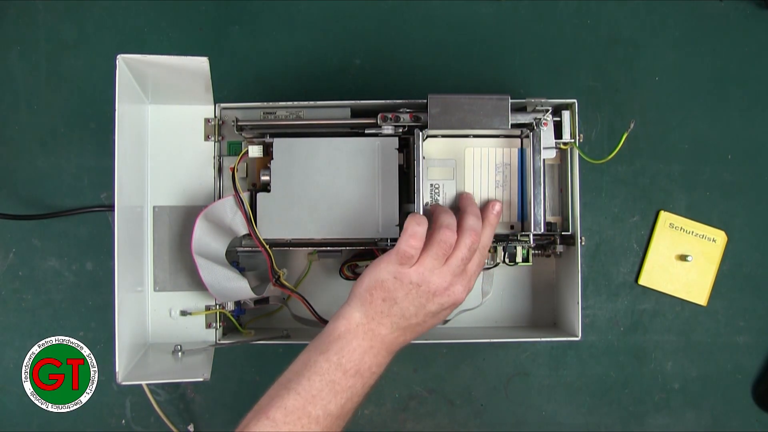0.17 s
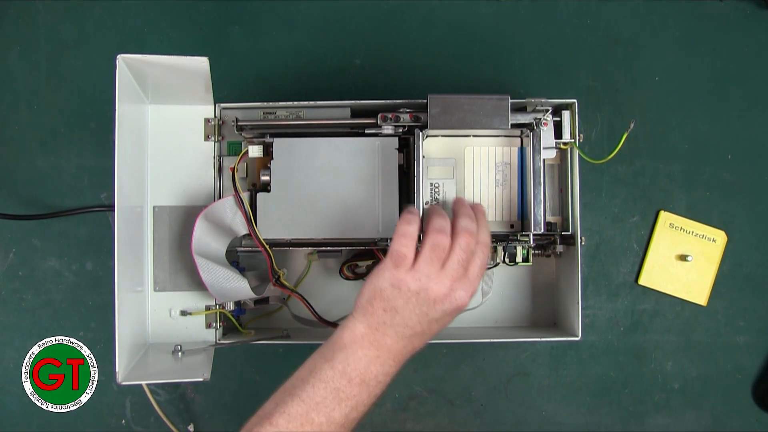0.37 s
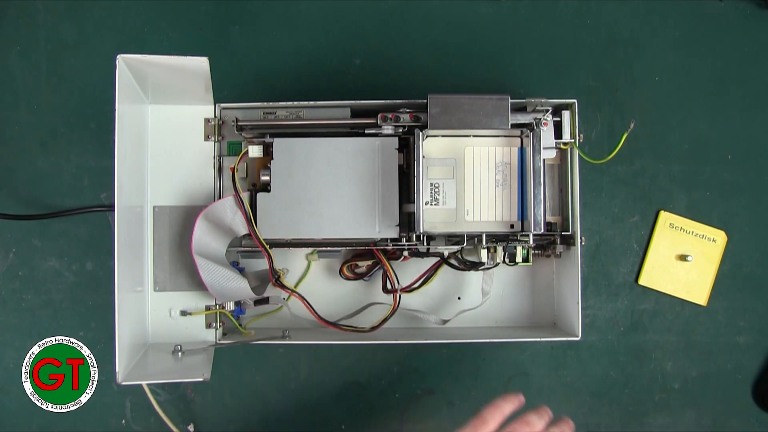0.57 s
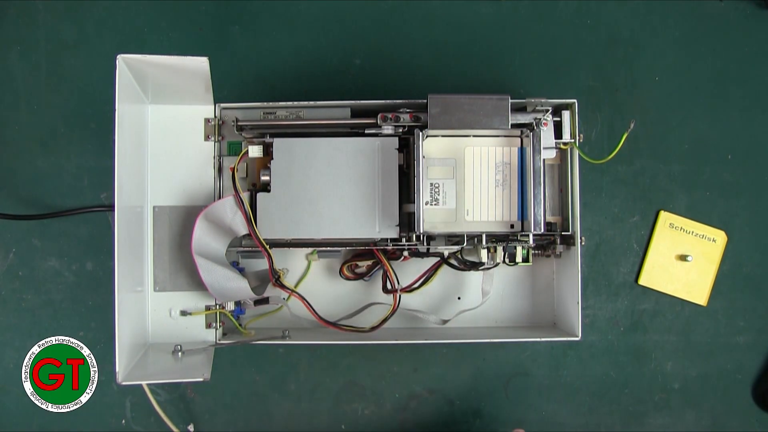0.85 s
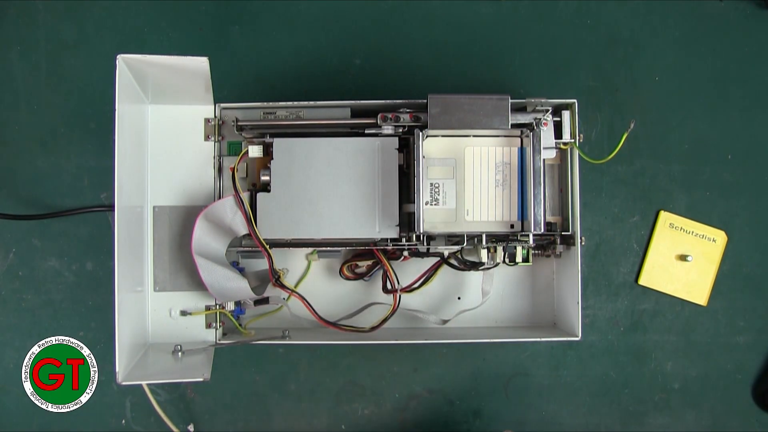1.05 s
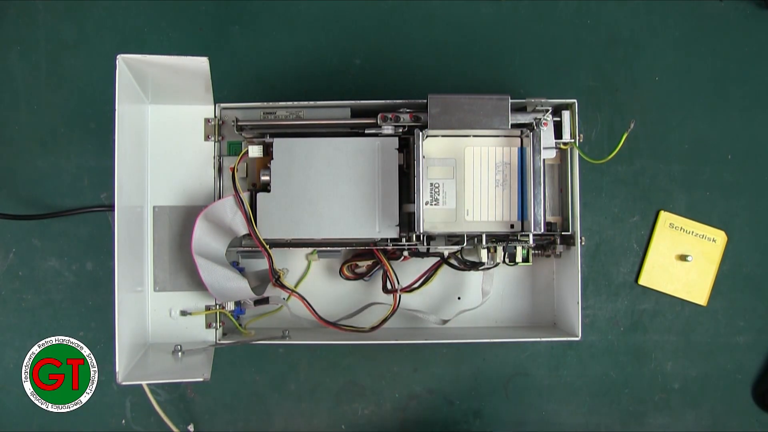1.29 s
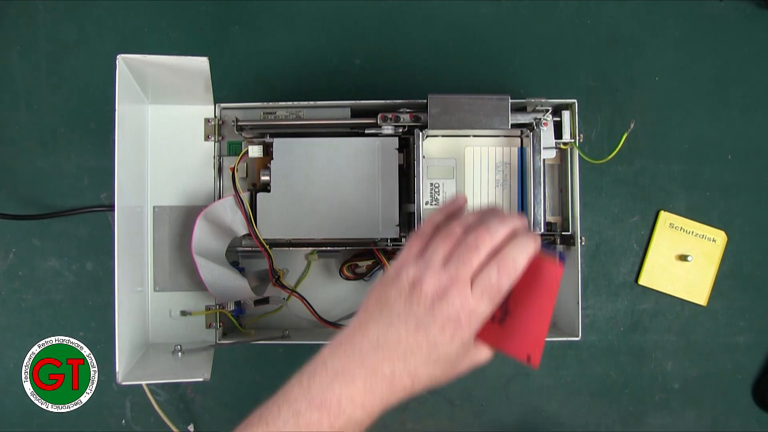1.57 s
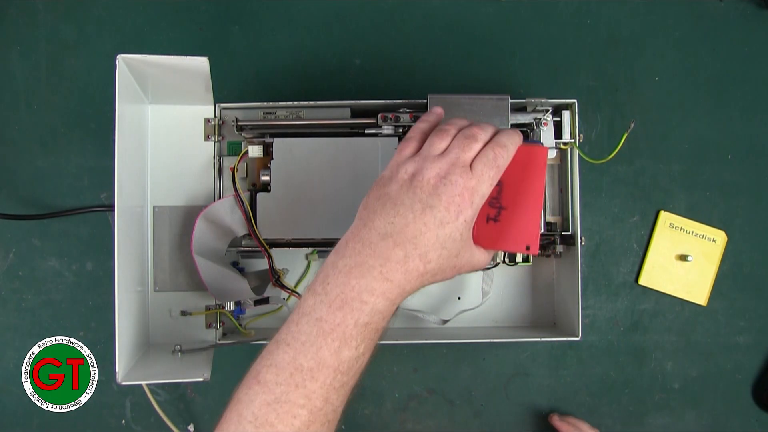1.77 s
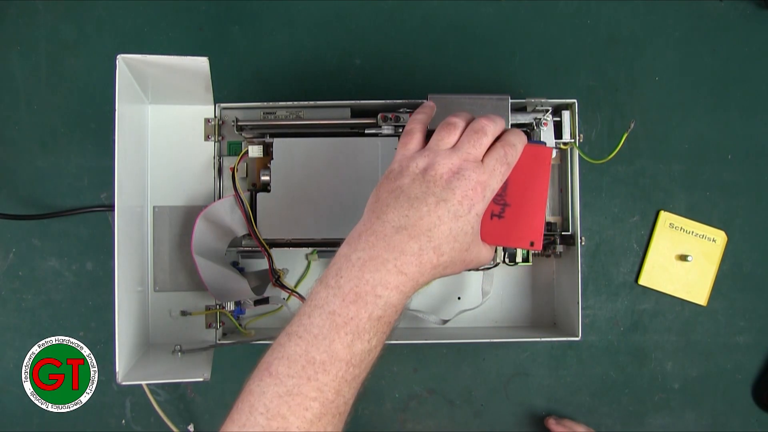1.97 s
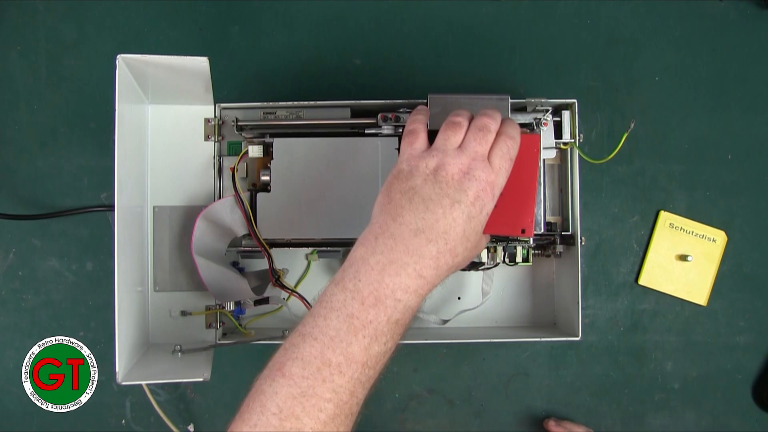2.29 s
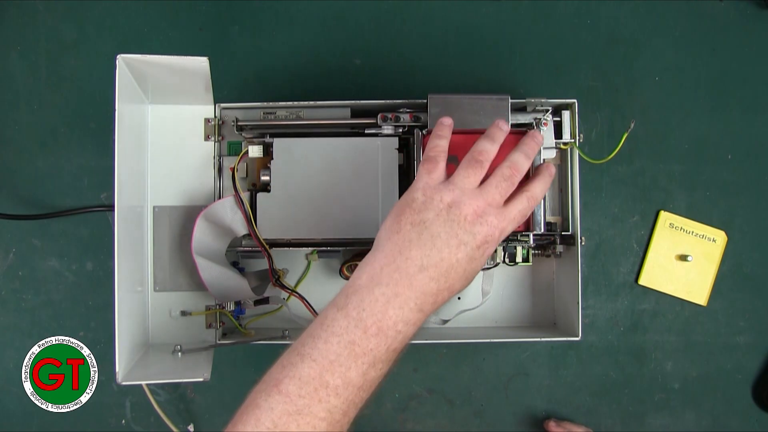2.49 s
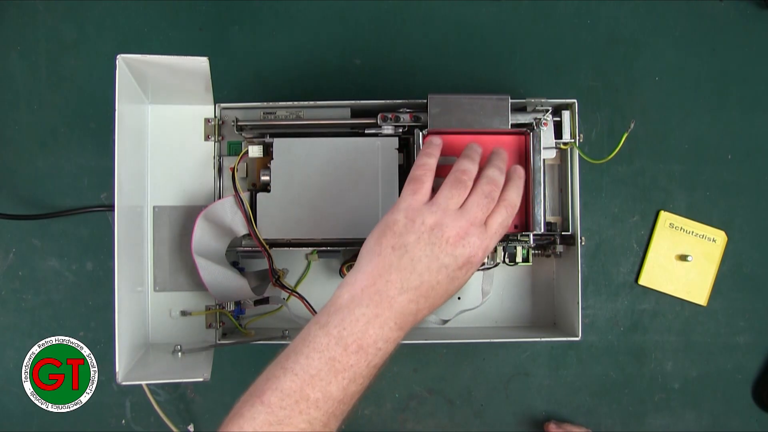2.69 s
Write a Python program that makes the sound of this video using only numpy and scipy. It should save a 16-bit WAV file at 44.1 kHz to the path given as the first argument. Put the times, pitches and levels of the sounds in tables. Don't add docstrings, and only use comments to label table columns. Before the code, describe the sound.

Plastic disks clatter into a sheet-metal magazine, heard close in a small, dry room with faint mains hum and hiss. Light clicks lead to the loudest, hard clack with a table thump at 0.23 s, settling by 0.35. Quiet handling follows, with a small tick and slide near 0.9 s and barely audible rubs. From 1.85 to 2.8 s a longer, uneven run of metallic clacks, rattles and scrapes settles.

```python
import sys
import numpy as np
from scipy import signal
from scipy.fft import rfft, irfft
from scipy.io import wavfile

SR = 44100
rng = np.random.default_rng(int(sys.argv[2]) if len(sys.argv) > 2 else 0)


def ratio(d):
    e = np.asarray(d, float) / 20
    return 10 ** e


def store_pcm(level_fs):
    pcm = np.round(np.clip(level_fs, -1, 1) * 32767).astype(np.int16)
    wavfile.write(sys.argv[1], SR, np.atleast_2d(pcm).T)


N = 125685


def unit_rms(x):
    return x / np.sqrt(np.mean(x ** 2) + 1e-20)


def at_peak(sound, peak_db):
    return ratio(peak_db) * sound / abs(sound).max()


def read(points, hz):
    point_hz, value = np.transpose(points)
    return np.interp(np.log(hz + 1), np.log(point_hz + 1), value)


def add(mix, start_s, sound):
    part = mix[max(round(start_s * SR), 0):][:len(sound)]
    part += sound[:len(part)]


def ring(hz, db, t60, size, phase=0.):
    t = np.arange(size)[:, None] / SR
    return (ratio(db - 60 * t / t60) * np.sin(2 * np.pi * hz * t + phase)).sum(1)


def coloured(x, spectrum):
    gain = ratio(read(spectrum, np.fft.rfftfreq(len(x), 1 / SR)))
    return irfft(rfft(x) * gain, len(x))


def causal(db):
    cepstrum = irfft(np.maximum(db, -100) * np.log(10) / 20)
    half = len(cepstrum) // 2
    cepstrum[1:half] *= 2
    cepstrum[half + 1:] = 0
    return irfft(np.exp(rfft(cepstrum)))


def clicks(per_s, spread_db, size):
    chance, strength, sign = rng.random((3, size))
    size_db = -spread_db * np.log(1 - .99 * strength)
    return (chance < per_s / SR) * ratio(size_db) * np.sign(sign - .5)


def bounces(size):
    return clicks(per_s=5000, spread_db=4, size=size)


# frequency in Hz, level in dB.
AIR_COLOUR = [(20, -12), (45, 2), (75, -14), (110, -16), (220, -25), (700, -24), (3800, -27.5), (5000, -31),
              (16000, -52)]
# frequency in Hz, level in dB rms.
MAINS_HUM = [(50, -65), (150, -77), (250, -94), (450, -91.5)]


def air():
    t = np.arange(N) / SR
    hiss = unit_rms(coloured(rng.standard_normal(N), AIR_COLOUR))
    hum = sum(np.sqrt(2) * ratio(db) * np.sin(2 * np.pi * hz * t) for hz, db in MAINS_HUM)
    return ratio(-71.5) * hiss + hum


# frequency in Hz, t60 in seconds.
ROOM_DECAY = [(100, 0.14), (500, .25), (2000, 0.13), (4000, 0.12), (8000, 0.21), (15000, 0.033)]


def room(x, count=3):
    size, spacing, gap_s = SR // 2, 12, .004
    out = np.zeros(N)
    turn = np.arange(N) / SR * 23
    for k in range(count):
        taps = np.zeros(size)
        at = np.arange(0, size - spacing, spacing)
        taps[at + rng.integers(0, spacing, len(at))] = rng.choice([-1., 1.], len(at))
        taps *= np.arange(size) > gap_s * SR
        hz, t, bands = signal.stft(taps, SR, nperseg=256)
        decay = ratio(-60 * t / read(ROOM_DECAY, hz)[:, None])
        tail = signal.istft(bands * decay, SR, nperseg=256)[1]
        feed = np.sqrt(2 / count) * np.cos(turn + np.pi * k / count)
        out += signal.fftconvolve(x * feed, tail / np.linalg.norm(tail))[:N]
    return out


# frequency in Hz, level in dB, t60 in seconds.
TABLE_MODES = [(84.65, 3.5, 0.28), (102, -12, 0.064), (61, -14, 0.15), (215.3, -6, 0.075),
               (380.8, -5.5, 0.11)]
# start in seconds, peak in dB, lift of the upper modes in dB.
TABLE_THUMPS = [(0.021, -51.5, 10.5), (0.138, -53.5, -21), (0.201, -45.5, 8), (0.23, -21, 3),
                (0.299, -39, 3), (0.348, -49, -6), (1.849, -51.5, -12), (2.069, -52, 11), (2.262, -35.5, 4),
                (2.33, -46, 7.5), (2.447, -44, 1.5), (2.511, -38, 6), (2.578, -52, 13), (2.789, -33.5, 6)]


def table():
    hz, db, t60 = np.transpose(TABLE_MODES)
    rise_s, size = 0.0072, 16000
    rise = np.sin(np.pi / 2 * np.minimum(np.arange(size) / SR / rise_s, 1)) ** 2
    out = np.zeros(N)
    for start_s, peak_db, upper_db in TABLE_THUMPS:
        boom = rise * ring(hz, db + upper_db * (hz > 150), t60, size)
        add(out, start_s, at_peak(boom, peak_db))
    return out


def rubbing(strokes, spectrum):
    t = np.arange(N) / SR
    rub = unit_rms(coloured(clicks(per_s=5600, spread_db=1, size=N), spectrum))
    low = signal.sosfiltfilt(signal.butter(2, 2600, fs=SR, output="sos"), rub)
    treble = rub - low
    out = np.zeros(N)
    for top_s, swell, fade, level_db, treble_db in strokes:
        slope = np.where(t < top_s, swell, fade)
        stroke = ratio(level_db - slope * np.hypot(t - top_s, .005))
        out += stroke * (low + ratio(treble_db) * treble)
    return out


# loudest moment in seconds, swell in dB per s,
# fade in dB per s, level in dB, treble in dB.
PICKUP_STROKES = [
    (.826, 2001, 400, -72.5, 1),
    (.878, 600, 222, -76, 17.5),
    (.95, 482, 650, -37, -0.5),
    (1.155, 297, 300, -73, -5),
    (1.222, 900, 256, -71, -1),
    (1.378, 900, 500, -83, -12),
    (1.44, 700, 600, -69.5, 6.5),
    (1.65, 403, 400, -98, 3),
    (1.72, 401.5, 402, -92, -5),
    (1.84, 500, 900, -70, 3),
]
# frequency in Hz, density in dB per Hz.
PICKUP_COLOUR = [(180, -79), (300, -55), (1100, -13), (1900, -3), (2450, -13), (3290, -2.5), (4200, -12),
                 (8220, -22.5), (16000, -43)]


def pickup_slides():
    return rubbing(PICKUP_STROKES, PICKUP_COLOUR)


# loudest moment in seconds, swell in dB per s,
# fade in dB per s, level in dB, treble in dB.
STACK_STROKES = [
    (.009, 591, 442, -32, -3),
    (.222, 499.5, 901.5, -41.5, 15),
    (.25, 3001, 270.5, -32, 9.5),
    (1.86, 3000, 203, -49, 9.5),
    (1.935, 900, 297, -48, -31),
    (2.22, 900, 190, -31, -3),
    (2.35, 504, 239, -41, -5),
    (2.5, 297, 151, -43, 12),
    (2.59, 303, 190, -49.5, -25),
    (2.778, 3000, 300, -39, 1.5),
]
# frequency in Hz, density in dB per Hz.
STACK_COLOUR = [(250, -45.5), (500, -18), (700, 2.5), (1300, -1.5), (2300, -2.5), (3500, 0), (5500, -17.5),
                (16000, -43.5)]


def stack_shuffles():
    return rubbing(STACK_STROKES, STACK_COLOUR)


# frequency in Hz, level in dB, t60 in seconds.
CASE_PANELS = [(216, -1.5, .12), (310, -4.5, 0.42)]


def case(loads):
    place, turn = rng.random(size=(2, 150))
    mode_hz = 500 + (4300 - 500) * place
    high = ring(mode_hz, 0, t60=.3, size=20000, phase=2 * np.pi * turn)
    deep = ring(*np.transpose(CASE_PANELS), size=8000)
    push = signal.sosfilt(signal.butter(2, 130, "high", fs=SR, output="sos"), abs(loads))
    murmur = signal.fftconvolve(loads, high / np.linalg.norm(high))[:N]
    panels = signal.fftconvolve(push, deep / np.linalg.norm(deep))[:N]
    return ratio(-23) * murmur + ratio(-40) * panels


# frequency in Hz, level in dB, t60 in seconds.
MAGAZINE_MODES = [(573, -6.5, 0.027), (657, -5.5, 0.018), (822, -3, 0.046), (918, -7, 0.12),
                  (1100, -1, 0.046), (1175, -14, 0.13), (1833, -11.5, .08), (2115, -10, 0.061),
                  (2257, -3.5, 0.09), (2703, -11.5, 0.25), (3440, -7, .05), (3700, -14, .06),
                  (4350, -17.5, 0.036), (8170, -29.5, 0.06)]
# frequency in Hz, density in dB per Hz.
SHELL_COLOUR = [(150, -59), (250, -33.5), (501, -23), (651, 2), (723, -4.5), (1140, -1), (1550, -9),
                (3340, -9), (16000, -42.5)]


def contact(peak_db, ring_hz, treble_db, rattle_s, cut_hz, metal_db, focus_db):
    f = np.fft.rfftfreq(4096, 1 / SR) + 1

    def focus(hz):
        return focus_db * np.exp(-(np.log2(hz / ring_hz) / 0.23) ** 2)

    ripple_db = 2.5 * np.interp(np.log2(f) / .15, np.arange(300), rng.standard_normal(size=300))
    shell = causal(read(SHELL_COLOUR, f) + focus(f) + ripple_db)
    shell = unit_rms(shell * np.hanning(8192)[4096:] ** 2)

    hz, db, t60 = np.transpose(MAGAZINE_MODES)
    mode_db = db + focus(hz) + 2 * rng.standard_normal(len(hz))
    metal = unit_rms(ring(hz, mode_db, t60, size=4096))
    extra_treble_db = treble_db - -27
    metal_db = metal_db - 0.044 * extra_treble_db

    t = np.arange(6000) / SR
    drive = bounces(6000)
    drive[0] = 4.5
    rise = np.minimum(0.36 + t / 0.001, 1)
    drive = drive * rise * np.exp(-t / np.minimum(rattle_s, .016))

    tilt_db = extra_treble_db * np.clip(np.log2(f / 2700), 0, 3) / 1.59
    bass_db = 34 * np.minimum(np.log2(f / cut_hz), 0)
    blow = signal.fftconvolve(drive, causal(tilt_db + bass_db)[:1024])
    return at_peak(signal.fftconvolve(blow, shell + ratio(metal_db) * metal), peak_db)


# start in seconds, peak in dB, loudest ring in Hz,
# treble in dB, rattle in seconds.
PICKUP_TICKS = [(0.819, -60.5, 2840, -20.5, 0.005), (0.8748, -30, 3440, -27, 0.0026),
                (0.947, -37, 3220, -16, 0.0029), (1.056, -65, 916, -37, 0.005),
                (1.134, -61.5, 1652, -23.5, 0.0068), (1.15, -60, 1824, -14, 0.0046),
                (1.17, -59.5, 1580, -38, 0.0079), (1.214, -57, 1690, -15.5, 0.0062),
                (1.377, -56, 1420, -22, 0.0024), (1.432, -58, 960, -27, 0.005),
                (1.644, -68, 3577, 1, 0.005), (1.714, -70, 2955, -12, 0.0048),
                (1.792, -62, 3410, 5, 0.0057)]


def pickup_ticks():
    out = np.zeros(N)
    for start_s, peak_db, ring_hz, treble_db, rattle_s in PICKUP_TICKS:
        tick = contact(peak_db, ring_hz, treble_db, rattle_s,
                       cut_hz=0.54 * ring_hz, metal_db=-30, focus_db=7)
        add(out, start_s, tick)
    return out


def singer(peak_db, hz, t60, rattle_s):
    drive = bounces(5000) * np.exp(-np.arange(5000) / SR / rattle_s)
    drive[0] = 3
    notes_hz = hz * (1 + .025 * rng.standard_normal(size=4) * [0, 1, 1, 1])
    note = ring(notes_hz, np.array([0, -5, -7, -9]), np.minimum(t60, .09), size=6000)
    rise = np.minimum(np.arange(6000) / SR * hz / 2, 1)
    return at_peak(signal.fftconvolve(drive, note * rise), peak_db)


# start in seconds, peak in dB,
# pitch in Hz, t60 in seconds, rattle in seconds.
SINGING_PARTS = [(.067, -50.5, 1790, 0.14, 0.12), (.07, -57.5, 3320, 0.064, 0.12),
                 (0.099, -54, 7800, 0.022, 0.017), (.137, -28.5, 657, 0.17, 0.019),
                 (.14, -28, 1820, .12, 0.019), (0.143, -38.5, 2280, 0.046, 0.011),
                 (.147, -42.5, 8320, 0.024, 0.022), (.184, -54, 3420, .06, 0.027),
                 (.208, -40, 3504, .05, 0.018), (1.055, -60, 890, 0.046, 0.0039),
                 (1.149, -57.5, 1814, .04, 0.0026), (1.17, -58, 1620, 0.035, 0.0039),
                 (1.847, -23, 2670, 0.049, 0.005), (1.849, -27.5, 3550, 0.053, 0.0082),
                 (1.848, -37, 5960, 0.098, 0.0086), (2.012, -33, 1350, 0.062, 0.0044),
                 (2.013, -37.5, 667, 0.07, 0.0078), (2.014, -38, 2280, 0.073, 0.0094),
                 (2.1188, -23.5, 1100, 0.054, 0.0018), (2.195, -18, 2324, 0.13, 0.0078),
                 (2.2, -24, 1144, 0.11, 0.015), (2.448, -18, 1930, 0.059, 0.014),
                 (2.517, -18.5, 3310, 0.039, 0.0016), (2.535, -28.5, 2295, 0.063, 0.012),
                 (2.549, -26, 890, 0.11, 0.0041), (2.552, -25, 1917, 0.037, .005),
                 (2.572, -32.5, 2020, 0.029, 0.0031), (2.741, -38.5, 700, 0.027, 0.0021),
                 (2.75, -37, 684, 0.075, 0.0023), (2.79, -51, 3370, 0.036, 0.0039)]


def singing_parts():
    out = np.zeros(N)
    for start_s, *part in SINGING_PARTS:
        add(out, start_s, singer(*part))
    return out


# start in seconds, peak in dB, loudest ring in Hz,
# treble in dB, rattle in seconds.
FIRST_LOAD = [(.0065, -22.5, 2860, -34, 0.0053), (.066, -59.5, 1840, -28, 0.037),
              (.101, -46.5, 8500, -11.5, 0.018), (.134, -25.5, 1360, -37, 0.01),
              (.147, -32, 650, -17.5, 0.013), (.184, -33, 3500, -29.5, 0.0046),
              (.193, -24.5, 655, -31.5, 0.006), (.208, -19.5, 3488, -22, 0.021),
              (.2285, -2, 2100, -24.5, 0.0032), (.23, -3.5, 3700, -26, 0.0033),
              (.232, -13.5, 1100, -27, 0.0013), (.242, -18, 1250, -21.5, 0.017),
              (.259, -18, 1240, -22, 0.0082), (.275, -17.5, 657, -20, 0.0097)]
# start in seconds, peak in dB, loudest ring in Hz,
# treble in dB, rattle in seconds.
SECOND_LOAD = [(1.8465, -14.5, 3200, -30.5, 0.022), (1.862, -18.5, 2600, -48, 0.0039),
               (2.012, -26, 1440, -44.5, 0.023), (2.066, -15.5, 3000, -22.5, 0.014),
               (2.119, -20.5, 1100, -36, 0.014), (2.18, -13.5, 2460, -35, 0.029),
               (2.195, -9.5, 1140, -35.5, 0.0076), (2.212, -19, 1050, -32.5, 0.03),
               (2.258, -12, 1100, -26.5, 0.0082), (2.276, -15.5, 870, -27.5, 0.011),
               (2.293, -15.5, 1020, -40, 0.0022), (2.333, -26.5, 940, -30, 0.015),
               (2.351, -24.5, 880, -33.5, 0.0062), (2.371, -30, 1106, -70, 0.0083),
               (2.4275, -15, 1100, -33, 0.01), (2.446, -11, 1250, -28, 0.017),
               (2.454, -7, 657, -22, 0.0087), (2.518, -19, 3130, -26.5, 0.015),
               (2.547, -22.5, 918, -29, 0.0096), (2.571, -26, 657, -29.5, 0.0074),
               (2.587, -26.5, 732, -19.5, 0.0072), (2.741, -38, 1100, -78, 0.0056),
               (2.772, -26.5, 2190, -35.5, 0.031), (2.793, -18, 835, -25.5, 0.0071)]


def disk_drops():
    out = np.zeros(N)
    for start_s, *blow in list(FIRST_LOAD) + list(SECOND_LOAD):
        add(out, start_s, contact(*blow, cut_hz=488, metal_db=-9.5, focus_db=5.5))
    return out


def scene():
    loads = disk_drops() + singing_parts()
    disks = loads + case(loads) + stack_shuffles() + pickup_slides() + pickup_ticks()
    return (disks + ratio(-9.5) * room(disks) + table() + air())[None]


def top_cut(x):
    return signal.sosfilt(signal.butter(12, 16460, fs=SR, output="sos"), x)


def record(dry):
    band_limit = signal.firwin(511, 16150, window=("kaiser", 9), fs=SR)
    mix = signal.oaconvolve(np.clip(dry, -1, 1), band_limit[None], "same")
    return top_cut(mix)


dry = scene()
out = record(dry)
store_pcm(out)
```